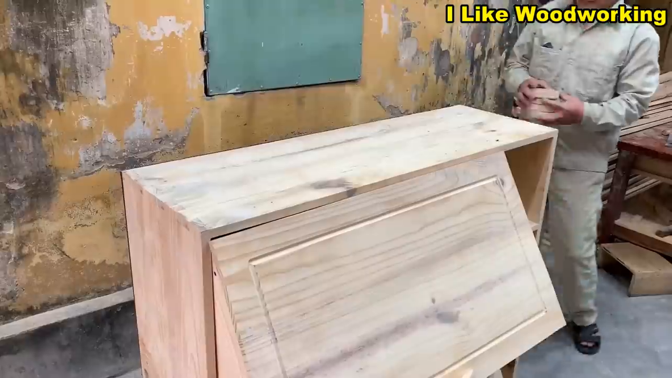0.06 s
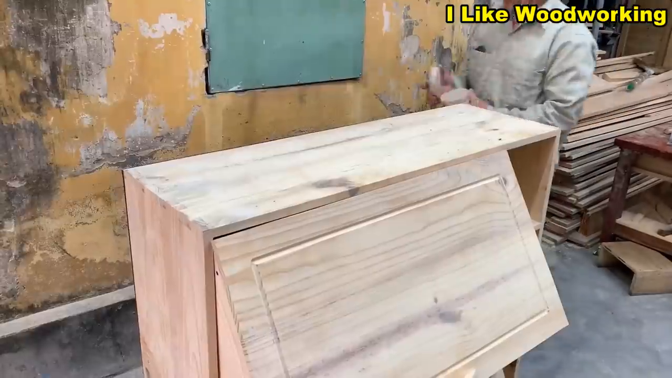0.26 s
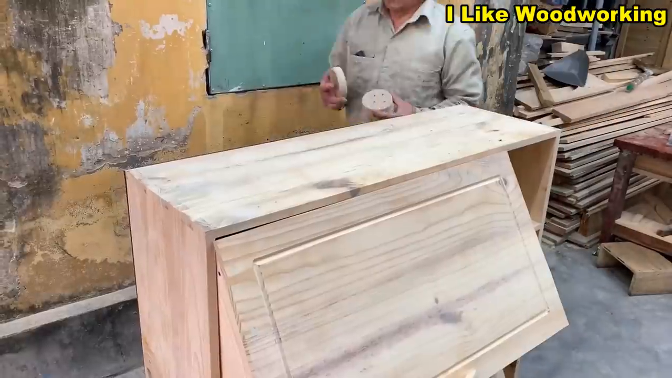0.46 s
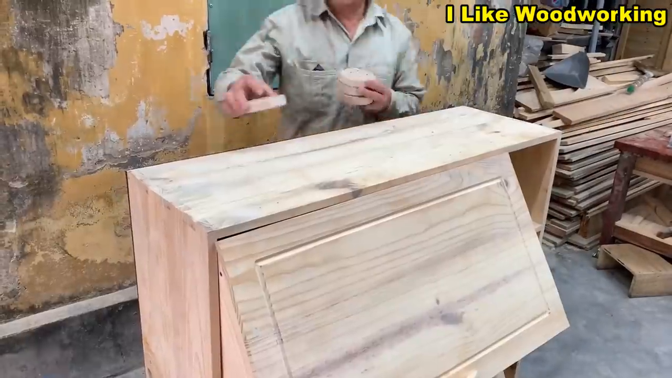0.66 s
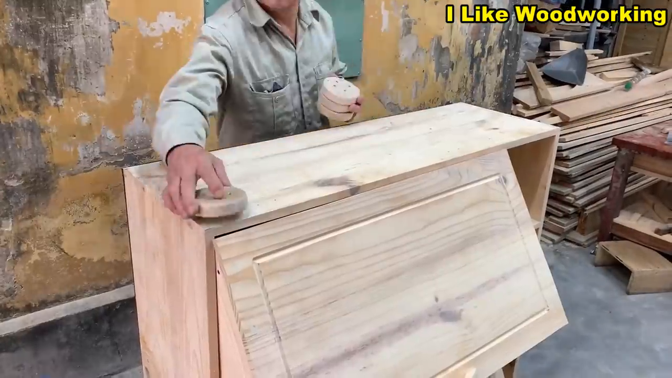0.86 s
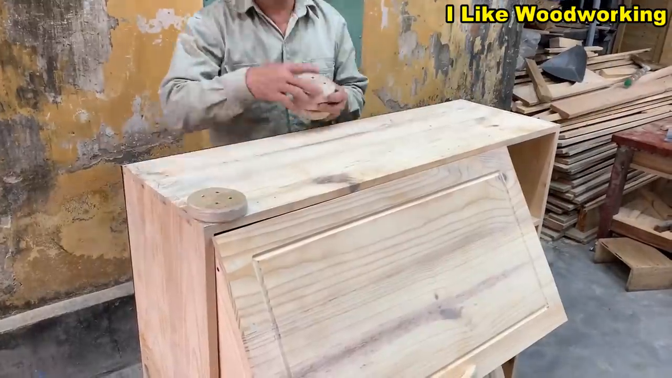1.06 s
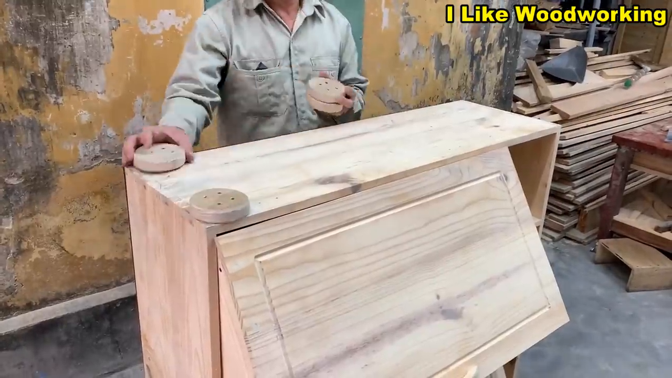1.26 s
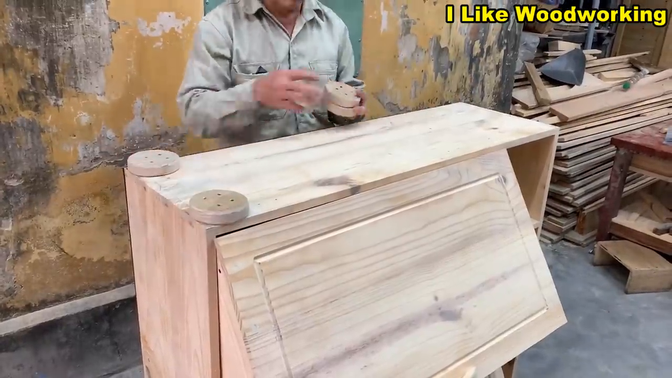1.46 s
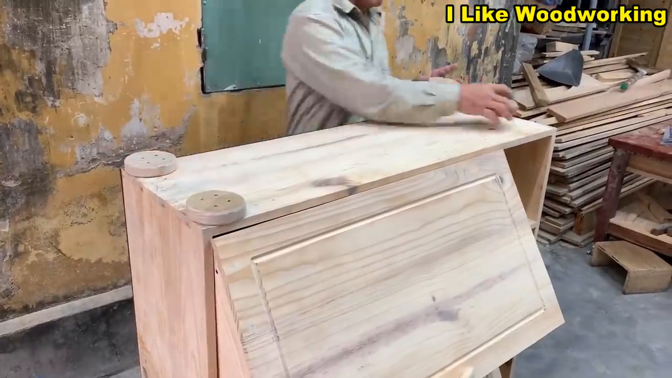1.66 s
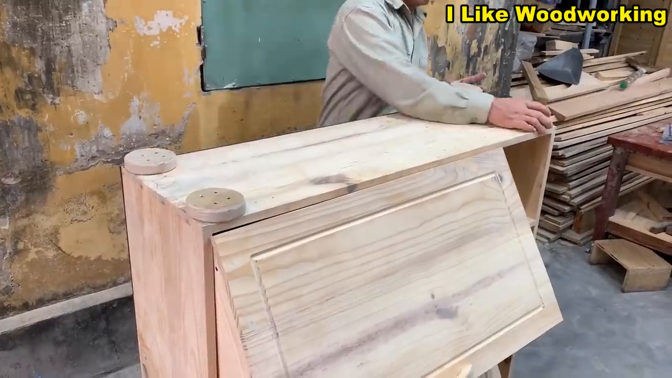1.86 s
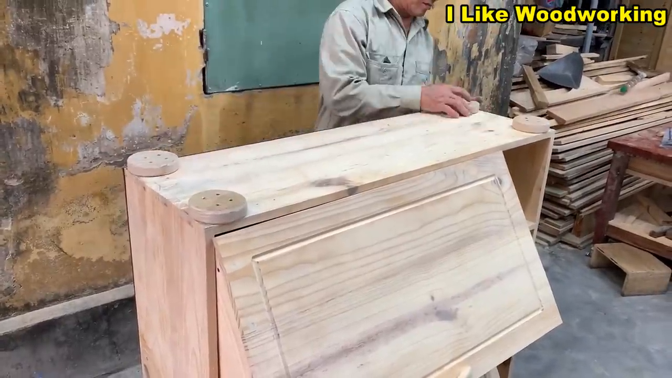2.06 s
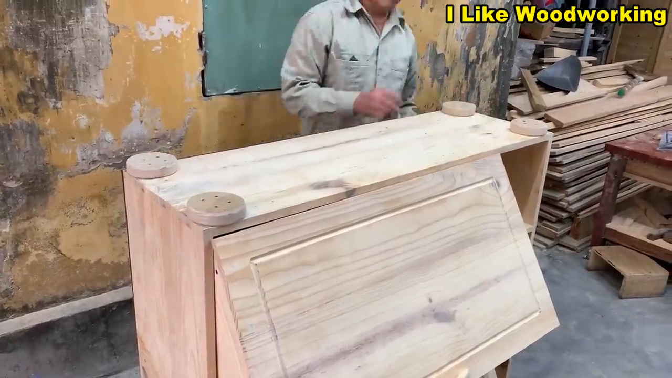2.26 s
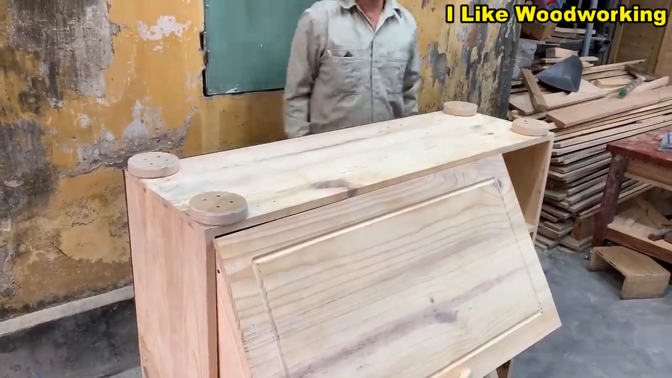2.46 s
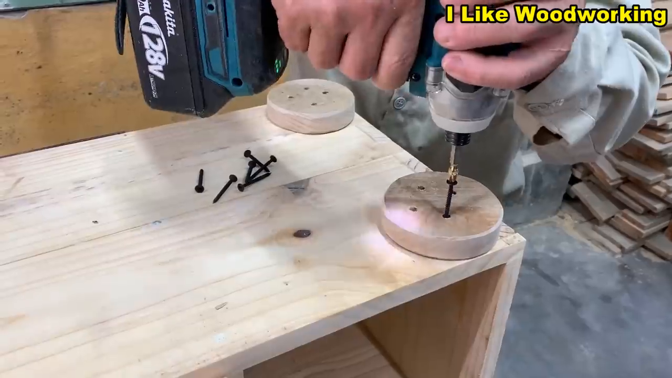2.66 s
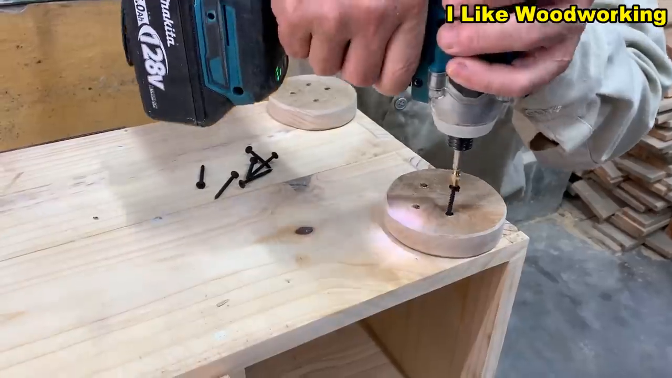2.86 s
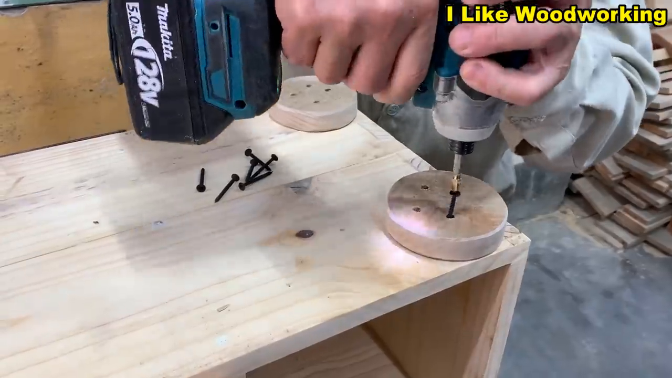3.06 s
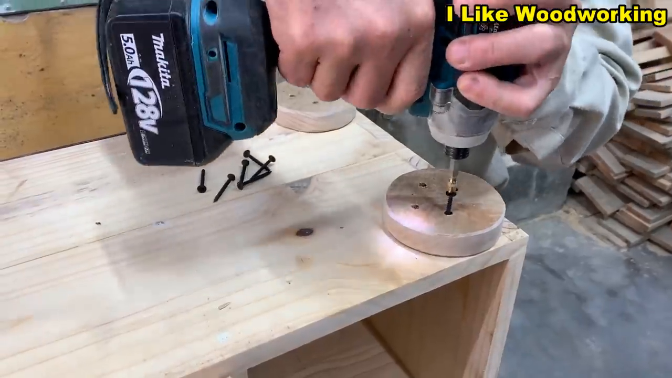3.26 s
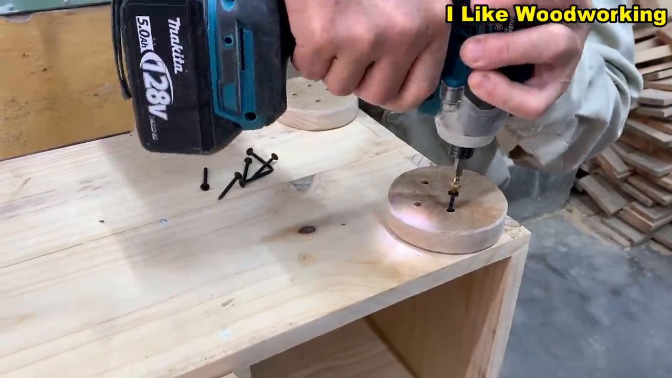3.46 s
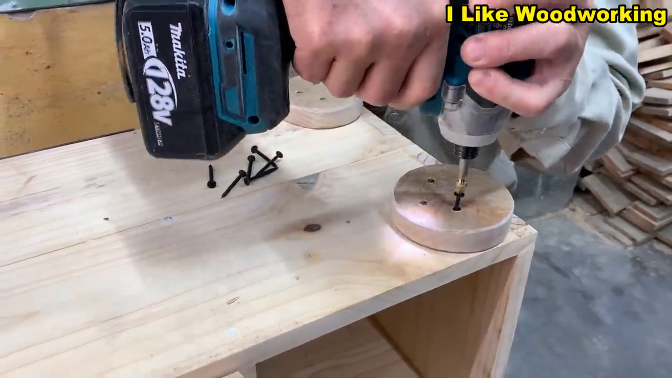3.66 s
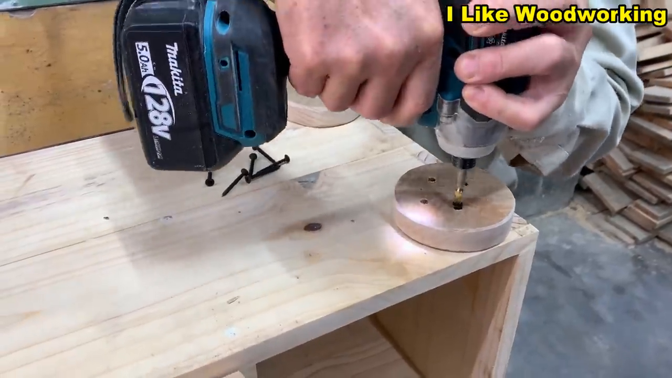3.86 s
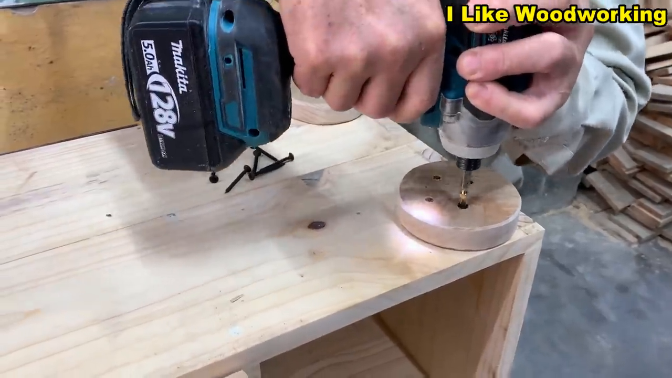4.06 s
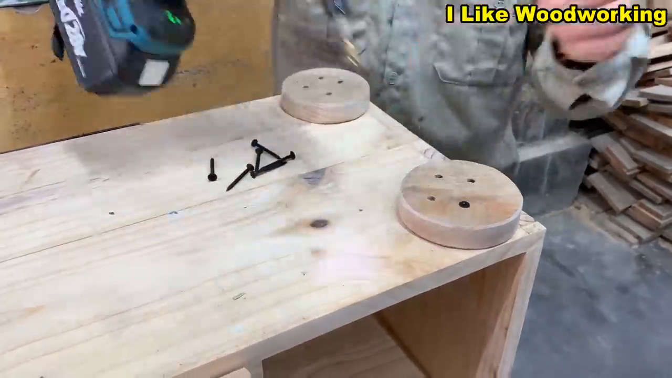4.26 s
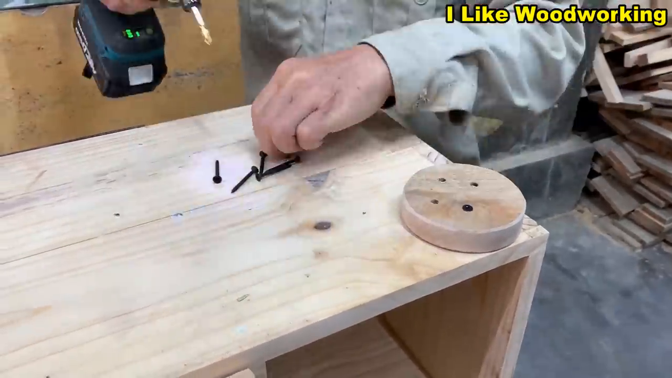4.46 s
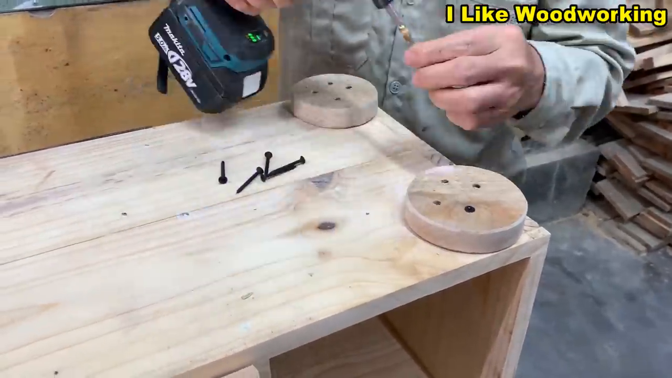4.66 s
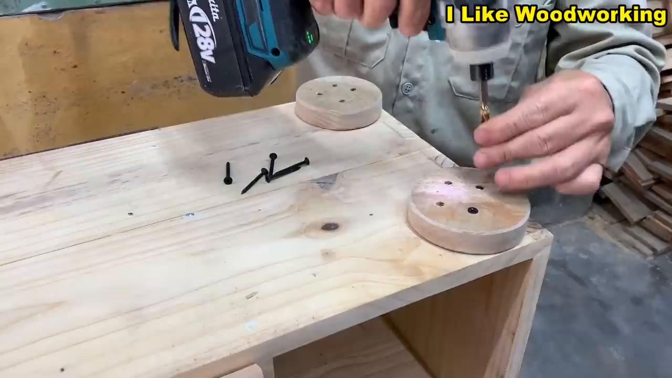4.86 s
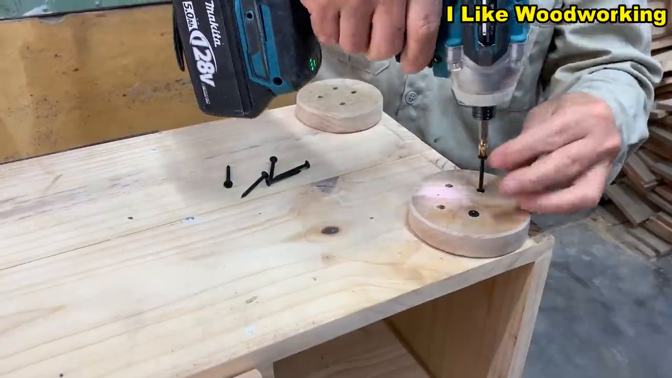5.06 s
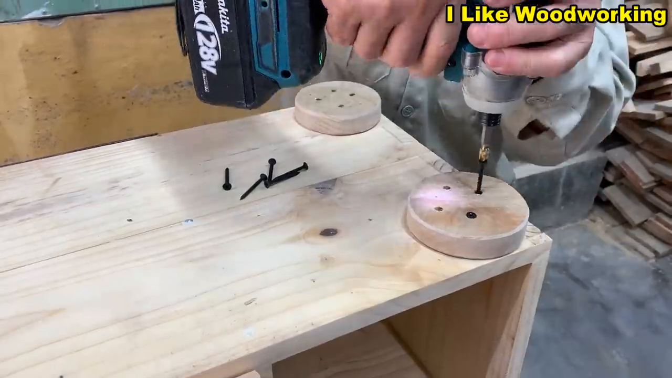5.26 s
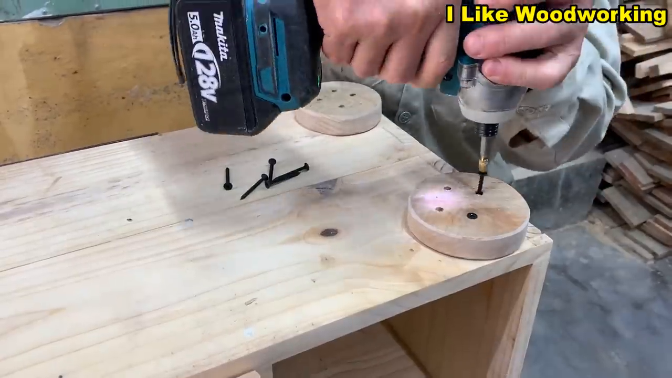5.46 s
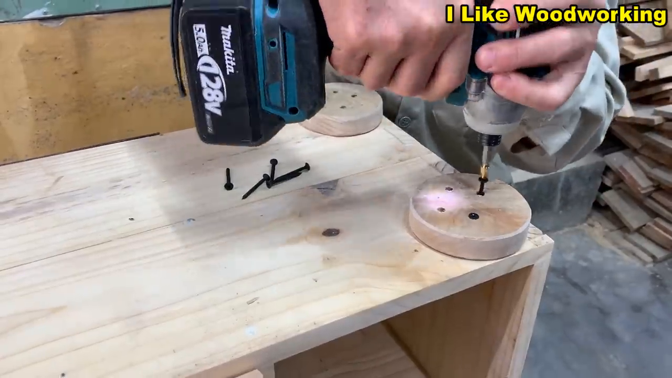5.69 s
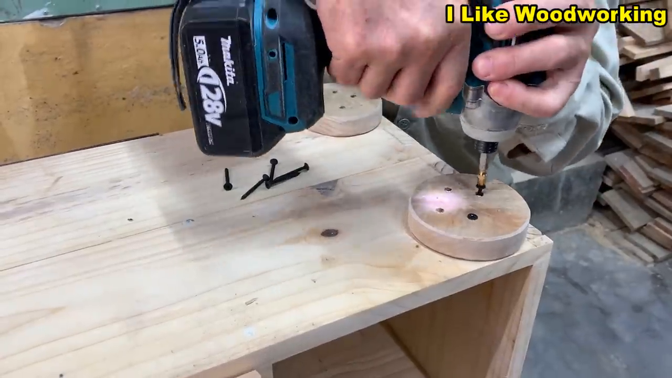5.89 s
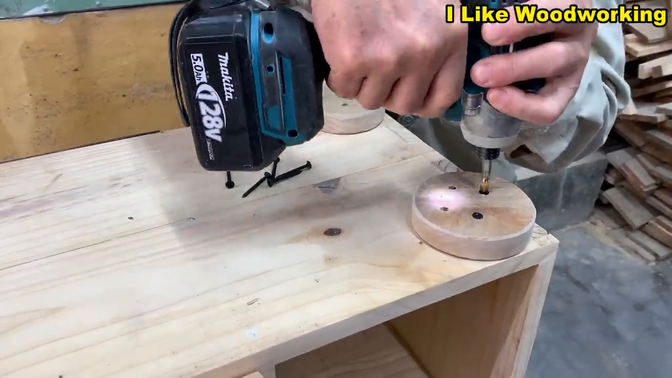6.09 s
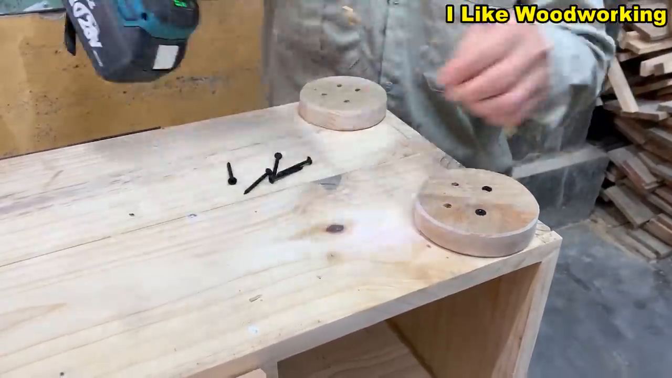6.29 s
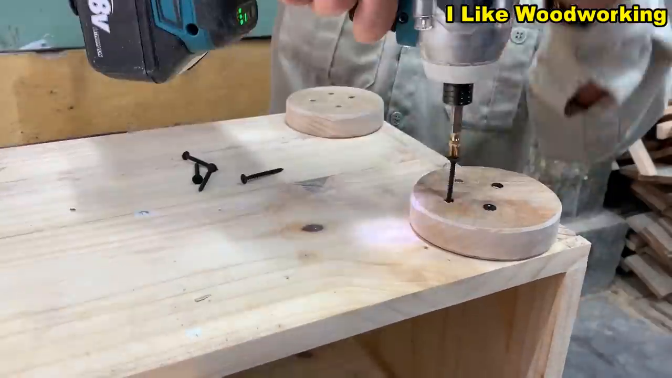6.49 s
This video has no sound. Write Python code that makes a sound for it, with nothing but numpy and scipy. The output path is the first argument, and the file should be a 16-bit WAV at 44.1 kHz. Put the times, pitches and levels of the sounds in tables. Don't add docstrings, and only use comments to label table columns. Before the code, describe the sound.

In a humming workshop, sharp knocks on wood give way to harsh, stuttering pulses of a cordless driver sinking screws into a cabinet.

```python
import sys
import numpy as np
from scipy import signal
from scipy.fft import rfft, irfft, next_fast_len
from scipy.io import wavfile
from scipy.ndimage import uniform_filter1d

SR = 44100
rng = np.random.default_rng(int(sys.argv[2]) if len(sys.argv) > 2 else 0)


def how_loud(loudness_db):
    steps = np.asarray(loudness_db, float) / 20
    return 10 ** steps


def inscribe(sig):
    pcm = np.round(np.clip(np.atleast_2d(sig).T, -1, 1) * 32767)
    wavfile.write(sys.argv[1], SR, pcm.astype(np.int16))


N = 287973
T = np.arange(N) / SR
FIRST_PULL = round(2.9 * SR)


def evened(x):
    return x / np.sqrt(np.mean(x ** 2) + 1e-20)


def colour(x, points):
    size = next_fast_len(len(x))
    hz, db = np.transpose(points)
    shape_db = np.interp(np.log(np.fft.rfftfreq(size, 1 / SR) + 1), np.log(hz + 1), db)
    return irfft(rfft(x, size) * how_loud(shape_db), size)[:len(x)]


def resonate(x, hz, width):
    r = np.exp(-np.pi * width / SR)
    if np.ndim(hz) == 0:
        cosine = np.cos(2 * np.pi * hz / SR)
        return np.sqrt(1 - r * r) * signal.lfilter([2, -2 * r * cosine], [1, -2 * r * cosine, r * r], x)
    turn = np.exp(2j * np.pi * np.cumsum(hz) / SR)
    return 2 * (turn * signal.lfilter([np.sqrt(1 - r * r)], [1, -r], x / turn)).real


def wander(count, span_s):
    knots = rng.standard_normal(int(count / SR / span_s) + 2)
    return np.interp(np.arange(count) / SR / span_s, np.arange(len(knots)), knots)


def body(x, modes, patchy_db, span_s=.012, tilt_db=0):
    centre_hz = modes[len(modes) // 2][0]
    out = 0
    for k, (hz, width, db) in enumerate(modes):
        drive_db = db + tilt_db * np.log2(hz / centre_hz) + patchy_db * wander(len(x), span_s)
        rung = resonate(x * how_loud(drive_db), hz, width)
        out = out + (-1) ** k * resonate(rung, hz, 510)
    return out


def slips(count, per_s, spread_db, smooth):
    size = how_loud(spread_db * np.minimum(rng.exponential(1, count), 3))
    hits = size * (rng.random(count) < per_s / SR)
    scrape = signal.lfilter([1], [1, -.97], hits)
    return evened((evened(scrape) + smooth) * rng.standard_normal(count))


def add(mix, s, sound):
    part = mix[round(s * SR):][:len(sound)]
    part += sound[:len(part)]


def curve(table, column):
    rows = np.array(table)
    return np.interp(T, rows[:, 0], rows[:, column])


def level(shapes):
    out = np.zeros(N)
    for start, corners in shapes:
        s, db = np.transpose(corners)
        at = round(start * SR) + np.arange(round(s[0] * SR), round(s[-1] * SR))
        out[at] = np.maximum(out[at], how_loud(np.interp(T[at] - start, s, db)))
    return out


def dying(start, db, db_per_s, span=0.13):
    return start, [(0, db), (span, db + db_per_s * span)]


# start_s, end_s
JOINTS = [
    (.138, .148),
    (2.622, 2.637),
]
FAR_SHOTS = T < JOINTS[1][1]
# time_s, level_db
HISS = [(0, -50), (.38, -57.5), (1.01, -51), (1.38, -53), (1.47, -57), (1.5, -52), (1.75, -53.5),
        (1.79, -56.5), (1.87, -54), (2.06, -52.5), (2.62, -52.5), (2.64, -57.5), (2.95, -52), (4.35, -63.5),
        (4.95, -66), (5.07, -68), (5.5, -65), (6.53, -67)]
# pitch_hz, level_db (per Hz)
HALL = [
    [(30, -44), (100, -10), (200, -12.5), (700, -13.5), (1000, -24.5), (1300, -27), (1570, -16),
     (2740, -14.5), (3700, -16), (6050, -14), (15100, -26), (16500, -35.5)],
    [(30, -48.5), (100, -8.5), (210, -3), (700, -25), (1090, -39), (2600, -26.5), (3780, -29.5),
     (5920, -23), (14800, -36), (16500, -30)],
]
# pitch_hz, side_db (against the middle)
HALL_WIDE = [(60, 6.5), (150, -22), (380, -54), (950, 4), (2380, -0.5), (5980, 1), (15000, 0)]


def hall():
    mid, side = np.zeros((2, N))
    swell = how_loud(curve(HISS, column=1) + 1.5 * wander(N, .05) + 1.5)
    for on, shape in zip([T < JOINTS[1][0], T > JOINTS[1][0]], HALL):
        a = colour(rng.standard_normal(N), shape)
        b = colour(rng.standard_normal(N), shape)
        treble = colour(a, [(1300, -60), (1400, 0)]).std()
        mid += on * swell * a / treble
        side += on * swell * colour(b, HALL_WIDE) / treble
    return np.array([mid + side, mid - side])


# time_s, speed_hz, level_db
HUM = [(0, 202, -10), (.7, 201, 11), (1.4, 201, 7), (1.6, 204, 1), (2.62, 203.5, 3.5), (2.64, 203.3, 2),
       (4.5, 203.2, -4.5), (6.53, 203.2, -8.5)]
# from_s, first_db, second_db, third_db, fourth_db
HUM_LOW = [
    (0, -65.5, -70.5, -60.5, -68),
    (1.5, -59.5, -59, -59, -59.5),
    (2.63, -64.5, -64.5, -72, -54.5),
]
# multiple (of the speed), level_db (against the hiss)
HUM_TOP = [(5, -8.5), (6, -15), (7, -8), (8, -7), (9, -15), (11, -13.5), (12, -17)]


def hum():
    speed_hz, hum_db = curve(HUM, column=1), curve(HUM, column=2)
    hiss_db = curve(HISS, column=1)
    turns = np.cumsum(speed_hz) / SR
    lag_s = 0.00042 * FAR_SHOTS
    ports = np.array([turns, turns - lag_s * speed_hz])
    low = np.array(HUM_LOW)
    place = np.maximum(np.searchsorted(low[:, 0], T) - 1, 0)
    levels = [(k, low[place, k] + hum_db) for k in range(1, 5)]
    levels += [(k, hiss_db + db - 9.6 * (place == 2)) for k, db in HUM_TOP]
    out = np.zeros((2, N))
    for k, db in levels:
        out += how_loud(db + 1.3 * wander(N, .06) + 3) * np.sin(2 * np.pi * (k * ports + rng.random()))
    return out


# start_s, length_s, level_db, pitch_hz
SWISHES = [(0.548, 0.39, -56.5, 1140), (0.554, 0.046, -54.5, 11820), (0.875, .05, -52.5, 10900),
           (.94, 0.039, -50.5, 7000), (1.91, 0.052, -52, 8000), (4.895, .14, -63.5, 2280),
           (5.117, 0.13, -65, 2300), (4.719, 0.13, -69, 2300)]


def swish():
    out = np.zeros(N)
    for s, length, db, hz in SWISHES:
        swell = np.sin(np.pi * T[:round(length * SR)] / length)
        rub = rng.standard_normal(len(swell))
        cloth = resonate(resonate(rub, hz, 0.89 * hz), hz, 0.89 * hz)
        add(out, s, how_loud(db) * swell * evened(cloth))
    return out


# start_s, peak_db, pitch_hz, brightness_db (against the peak)
BUMPS = [(0.221, -27.5, 450, -8), (1.369, -34.5, 202, -20), (1.502, -29, 232, -19), (1.738, -38, 240, -25),
         (2.638, -30, 250, -17), (2.739, -24, 450, -8.5), (2.763, -24, 212, -33), (2.806, -31.5, 544, -2),
         (2.819, -28, 275, -30), (2.837, -25, 216, -0.5), (2.864, -38, 373, -15), (2.885, -21.5, 275, -9),
         (2.926, -31, 299, -26), (3.258, -28.5, 428, -20), (3.461, -25, 335, -5.5), (4.419, -38, 328, -3),
         (4.599, -35, 396, -28), (4.618, -29.5, 283, -15.5), (4.914, -43, 248, -23),
         (5.006, -41.5, 250, -40), (5.176, -39, 676, -11), (5.202, -36.5, 260, -20), (5.452, -39, 303, -28),
         (5.493, -32, 366, -26), (5.726, -28.5, 260, -5.5), (5.743, -25.5, 229, -4.5),
         (6.396, -30.5, 425, -21), (6.424, -30.5, 363, -5), (6.461, -45.5, 295, 5.5),
         (.272, -46, 298, -18), (.297, -60, 300, -20), (.45, -43.5, 300, -20), (.617, -40, 297, -20),
          (1.358, -47, 220, -25), (1.382, -48, 350, -20), (1.425, -39, 350, -25), (1.525, -41, 375, -20),
          (1.553, -43, 237, -25), (1.6, -50, 298, -27), (1.683, -52, 400, -20), (1.722, -40, 239, -25),
          (1.757, -39, 298, -24), (1.833, -56, 800, 12), (2.673, -36.5, 245, -25), (2.7, -33.5, 288, -25),
          (2.724, -32.5, 402, -14), (2.813, -35.5, 500, -2), (2.847, -26.5, 450, -7), (2.854, -34, 500, -3),
          (2.873, -31.5, 500, -3.5), (2.879, -34, 500, -6), (2.903, -39, 396, -4.5),
          (2.917, -30.5, 296, -28), (4.347, -28, 450, -5.5), (4.363, -36, 450, -8), (4.633, -36, 300, -8),
          (4.734, -43.5, 300, -15), (5.236, -33.5, 302, -23), (5.248, -35, 355, -14),
          (6.408, -34.5, 400, -11.5), (6.447, -39, 400, -8), (6.466, -35.5, 300, -20),
          (6.489, -38, 300, -4), (6.507, -41, 300, -19)]


def bumps():
    out, t = np.zeros(N), T[:3000]
    for s, db, hz, bright_db in BUMPS:
        noise = rng.standard_normal(len(t))
        blow = noise * how_loud(-60 * t / .04) * np.minimum(t / .003, 1)
        low = resonate(resonate(blow, hz, 230), hz, 390)
        edge = noise * how_loud(-60 * t / .011)
        for _ in range(3):
            edge = resonate(edge, 1100, 1100)
        add(out, s, how_loud(db) * (low / abs(low).max() + how_loud(bright_db + 3) * edge / abs(edge).max()))
    return out


# time_s, level_db
RUMBLE = [(0.0, -37), (0.3, -49), (0.42, -56.5), (0.93, -59.5), (1.33, -59.5), (2.62, -60.5), (2.72, -50),
          (2.84, -36.5), (2.93, -40), (3.1, -45.5), (4.18, -43), (4.42, -53.5), (4.71, -61), (5.05, -70.5),
          (5.2, -58.5), (5.42, -59), (5.51, -46.5), (6.53, -46)]
# pitch_hz, level_db (per Hz)
THUD = [(35, -49), (60, -17.5), (108, -14.5), (189, 8.5), (262, 12), (746, -3), (810, -2.5), (3000, -36),
        (3900, -74.5), (6600, -120)]


def creaking_rumble():
    lumps_db = curve(RUMBLE, column=1) - 1.5 + 3.5 * wander(N, .015)
    rumble = evened(colour(slips(N, 160, 3.0, .9), THUD))
    rumble = np.where(FAR_SHOTS, colour(rumble, [(800, 1), (1000, -20)]), rumble)
    ticks = evened(resonate(resonate(slips(N, 160, 1.6, 0), 800, 900), 800, 900))
    return how_loud(lumps_db) * (rumble + how_loud(-15) * ticks * ~FAR_SHOTS)


# start_s, peak_db, crack_db (against the peak), rattle_s (to fall 60 dB)
KNOCKS = [
    (0.012, -12, -11, 0.21),
    (0.103, -9.5, -6.5, 0.14),
    (1.006, -24.5, 4.5, 0.12),
    (1.868, -24.5, -7.5, 0.26),
    (2.048, -8.5, -7.5, 0.18),
]
CRACK_TOP_HZ = [15250, 15100, 12900, 6000, 9000]
# pitch_hz, width_hz, level_db
PANEL = [(250, 51, -6.5), (450, 194, -0.5), (676, 92, 1), (850, 180, -4), (1045, 40, -8), (1293, 53, -7.5),
         (1870, 1500, -15), (2390, 330, -2.5), (4990, 200, -25)]
# pitch_hz, width_hz, level_db
DISCS = [
    [(500, 80, -14), (836, 23, 2.5), (1480, 66, -17), (4660, 480, -5), (8400, 900, -23)],
    [(416, 21, -6), (700, 67.3, -6.5), (2220, 420, 0), (2830, 300, -9.5), (4660, 620, -17.5)],
    [(425, 20, -21), (690, 46, -15.5), (2310, 420, 1), (2860, 370, -6), (3390, 400, -8), (4300, 310, -4.5),
     (5200, 270, -10), (6230, 360, -4), (7650, 400, -11)],
]


def knocks():
    out, t = np.zeros(N), T[:SR // 4]
    for (s, db, crack_db, t60), modes, top_hz in zip(KNOCKS, [PANEL, PANEL] + DISCS, CRACK_TOP_HZ):
        rattle, hit = how_loud(-60 * t / t60), how_loud(7 - 60 * t / .02)
        blow = rng.standard_normal(len(t)) * (rattle + hit)
        rung = body(blow, modes, patchy_db=3.5, span_s=.006)
        crack_band = signal.butter(2, [1800, top_hz], "band", fs=SR, output="sos")
        crack = signal.sosfilt(crack_band, blow)
        add(out, s, how_loud(db) * (rung / abs(rung).max() + how_loud(crack_db) * crack / abs(crack).max()))
    return out


# start_s, peak_db
SNAPS = [(3.03, -2), (3.134, 1), (3.3237, -2.5), (3.3578, -12), (3.3948, -29.5), (3.3979, -20),
         (3.6674, -2), (4.1136, -18.5), (4.1266, -2), (4.329, -22.5), (5.351, -45), (5.461, -40.5),
         (5.538, -15.5), (4.23, -3.5), (5.5934, -9.5), (5.6067, -2), (5.6129, -11), (5.628, -10.5),
         (5.8269, -18), (5.838, -10.5), (5.8543, -10.5), (6.121, -20), (6.126, 0), (6.1677, -12.5),
         (6.1768, -12), (6.1814, -8.5)]
# start_s, level_db
JERKS = [(2.974, -2.5), (2.987, -7), (3.036, -5.5), (3.14, -9.5), (3.296, -3.5), (3.503, -4.5),
         (3.526, -1.5), (3.657, 0.5), (3.825, -2.5), (3.836, 1), (3.99, 3), (4.129, -2.5), (4.255, 4),
         (4.261, 4.5), (4.268, 1), (5.578, -1), (5.787, 0), (5.792, -6), (5.835, -3.5), (5.86, -2.5),
         (5.985, -0.5), (6.129, -3.5), (6.284, 4.5), (6.298, -4)]
# pitch_hz, level_db (per Hz)
STEEL = [(700, -24.5), (1470, -7.5), (2500, -4), (3050, -9), (4050, -8.5), (4340, -3.5), (7150, -4),
         (9570, -1.5), (10300, -9), (14400, -0.5), (16000, -9), (16500, -127)]
# pitch_hz, width_hz, level_db
SCREW = [(1171, 33, -5), (1407, 110, -0.5), (1501, 40, -3.5), (1697, 96, 3), (1774, 16, -1),
         (1974, 160, 1.5), (2079, 75, -1), (2251, 110, -2.5), (2608, 570, -9), (3140, 300, -4.5)]
# pitch_hz, width_hz, level_db
CABINET = [(306.6, 23, -17.5), (398.3, 72, 1.5), (425, 27, -1), (578.5, 120, -3), (622, 10, 2.5),
           (654.4, 14, 5), (673.3, 45, 5), (819.7, 13, 1.5), (934, 47, -6.5), (1004, 15, -5.5)]


def snaps():
    out, push, t = np.zeros(N), np.zeros(N), T[:600]
    for s, db in SNAPS:
        spit = evened(colour(rng.standard_normal(len(t)), STEEL))
        add(out, s, how_loud(db - 15.5 - 60 * t / 0.023) * spit)
    for s, db in SNAPS + JERKS:
        add(push, s, how_loud(np.array([db])))
    wood = body(push[FIRST_PULL:], SCREW + CABINET, patchy_db=3.5)
    add(out, FIRST_PULL / SR, how_loud(-28.5) * wood)
    return out


# start_s,
# length_s, from_hz, to_hz, level_db
SQUEALS = [
    (3.965, 0.023, 9400, 14750, -22),
    (5.556, 0.056, 2900, 1850, -32.5),
    (5.782, 0.038, 2190, 1835, -25.5),
    (5.964, .022, 5650, 8950, -30.5),
    (6.13, 0.029, 10000, 14570, -19),
    (6.325, 0.023, 660, 643, -28.5),
]
SKIPS = [6.1355, 6.1415, 6.1565]


def squeals():
    glide, swell = 0.24, 0.16
    hz, shapes = np.zeros(N), []
    for s, n, from_hz, to_hz, db in SQUEALS:
        on = (T >= s - .001) & (T < s + n + .001)
        hz[on] = to_hz + (from_hz - to_hz) * np.exp(-(T[on] - s) / (glide * n))
        shapes.append((s, [(0, db + 2), (swell * n, db), (n - swell * n, db + 4.5), (n, db - 7.0)]))
    for s in SKIPS:
        hz[abs(T - s) < .0012] = 11750
    hz = uniform_filter1d(hz, size=30) * (1 + .012 * wander(N, .003))
    flutter_db = 2.1 * evened(uniform_filter1d(rng.standard_normal(N), 90))
    return level(shapes) * how_loud(flutter_db + 2.5) * np.sin(2 * np.pi * np.cumsum(hz) / SR)


# bite_s, length_s, rasp_db, sag_db (by the release), ring_hz (of the bit)
PULLS = [(2.967, 0.055, -18.5, -16.5, 8000), (3.117, 0.068, -14.5, -16.5, 9000),
         (3.289, .073, -18, -6.5, 9860), (3.48, 0.056, -14.5, -11.5, 7370), (3.642, 0.059, -17.5, -8, 9920),
         (3.795, 0.062, -18.5, -3, 9850), (3.958, 0.054, -20, -8.5, 13500), (4.1, 0.045, -20, -9, 8500),
         (4.227, 0.047, -18.5, -11, 8100), (5.535, 0.11, -19, -7, 8570), (5.778, 0.08, -22, 0, 9300),
         (5.948, 0.074, -19, -5, 8380), (6.121, 0.055, -28, -6, 14300), (6.271, 0.029, -21, -3, 8600)]
# rise_s (of the rasp), creak_tilt_db, boom_tilt_db (both per octave)
SEATS = [(.006, 3, 1), (0.0014, 1, -3.2), (.0015, 4.9, -5.3), (0.0089, -0.5, -0.5), (0.01, 3.5, -3.5),
         (.003, -0.5, -4.5), (.003, -1.5, -0.5), (.004, -1, -1), (.0012, 2.5, -6), (.0012, -2.7, 2),
         (.003, -2.2, 2), (0.00091, -1.8, 5.8), (0.0025, -2.5, 2), (.004, 1, -2.6)]
# start_s, rasp_db, creak_db, boom_db
REBOUNDS = [
    (3.029, -26.5, -24, -21),
    (3.21, -49, -34.5, -28.5),
    (3.397, -31.5, -37.5, -24.5),
    (6.323, -52, -40, -43),
]
BITES = np.array(PULLS)[:, 0]
PULL_NOW = np.maximum(np.searchsorted(BITES, T) - 1, 0)


def rasp_level():
    coast_db = -43
    shapes = []
    for (s, n, db, sag_db, _), (rise_s, _, _) in zip(PULLS, SEATS):
        shapes.append((s, [(0, db - 8.5), (rise_s, db), (n, db + sag_db)]))
        shapes.append((s + n, [(0, db + sag_db), (0.0073, coast_db)]))
        shapes.append(dying(s + n, coast_db, db_per_s=-300))
    shapes += [(s, [(0, db), (0.024, db - 18.5)]) for s, db, *_ in REBOUNDS]
    return uniform_filter1d(level(shapes), size=60)


# pitch_hz, width_hz, level_db
BIT = [(5500, 1000, 1.5), (7260, 1600, 20.5), (8700, 200, -33.5), (9900, 420, 14), (11380, 300, 2),
       (14300, 140, -15)]


def rasp():
    fine = slips(N, 400, 2.8, 1.0)
    ring_hz = np.array(PULLS)[PULL_NOW, 4]
    tones = evened(body(fine, BIT, patchy_db=4.5)) + how_loud(-2.5) * evened(resonate(fine, ring_hz, 260))
    steel = evened(colour(fine, STEEL)) + how_loud(-5) * tones
    return evened(steel) * rasp_level()


# grip_s, hold_s, creak_db, boom_db, jolt_db (of the bite before)
GRIPS = [(2.975, 0.0095, -22, -18.5, -28), (3.138, 0.03, -22, -21, -44), (3.321, 0.033, -22, -23.5, -8.5),
         (3.5, 0.034, -24, -19.5, -33), (3.654, 0.051, -24.5, -21.5, -8.5),
         (3.809, 0.046, -22.5, -20.5, -11.5), (3.991, 0.011, -20, -19, -12.5),
         (4.122, 0.015, -17, -16.5, -13), (4.235, 0.021, -18, -15, -15.5), (5.576, 0.067, -28, -24.5, -56),
         (5.821, 0.034, -25, -24, -14.5), (5.971, 0.049, -24.5, -23, -10.5),
         (6.177, 0.0069, -32.5, -23, -16), (6.276, 0.01, -20, -18.5, -21)]


def wood_level(column, db_per_s, kicks):
    shapes = list(kicks)
    for row in GRIPS:
        grip_s, hold_s, db = row[0], row[1], row[column]
        shapes.append((grip_s, [(-.006, db - 13), (0, db), (hold_s, db)]))
        shapes.append(dying(grip_s + hold_s, db, db_per_s))
    shapes += [dying(row[0], row[column], db_per_s) for row in REBOUNDS]
    return uniform_filter1d(level(shapes), size=150)


def struck(drive, gain, modes, tilt_db, span_s):
    ringing = .8
    out = np.zeros(N)
    gain = abs(gain[FIRST_PULL:]) + 1e-7
    push = drive[FIRST_PULL:] * gain ** ringing
    rung = body(push, modes, patchy_db=2.2, span_s=span_s, tilt_db=tilt_db[FIRST_PULL:])
    out[FIRST_PULL:] = evened(rung * gain ** (1 - ringing)) * np.sqrt(np.mean(gain ** 2))
    return out


def creak_and_boom():
    coarse = slips(N, 300, 2.5, .8)
    _, creak_tilt, boom_tilt = np.array(SEATS)[PULL_NOW].T
    catches = [dying(s + 0.0022, max(row[4], -40) - 8.5, -600) for s, row in zip(BITES, GRIPS)]
    jolts = [dying(s + 0.0032, row[4], -900, span=.05) for s, row in zip(BITES, GRIPS)]
    creak_level = wood_level(column=2, db_per_s=-620, kicks=catches)
    boom_level = wood_level(column=3, db_per_s=-520, kicks=jolts)
    creak = struck(coarse, creak_level, SCREW, creak_tilt, span_s=.03)
    boom = struck(coarse, boom_level, CABINET, boom_tilt, span_s=0.065)
    return creak + boom


# start_s, length_s, from_db, to_db
IDLES = [
    (2.929, 0.067, -37, -25),
    (5.463, .072, -46, -40.5),
]


def whirr():
    rub = rng.standard_normal(N)
    motor = evened(colour(rub, STEEL)) + how_loud(-6.5) * evened(resonate(rub, 8500, 500))
    winds = [(s, [(-.022, -53.5), (0, -28)]) for s in np.delete(BITES, 9)]
    winds += [(s, [(0, from_db), (n, to_db)]) for s, n, from_db, to_db in IDLES]
    return level(winds) * evened(motor)


def driver():
    return rasp() + creak_and_boom() + whirr()


def echoes(x, t60, start):
    taps, t = np.zeros(SR // 2), T[:SR // 2]
    at = np.arange(round(start * SR), len(taps) - 20, 20)
    taps[at + rng.integers(0, 20, len(at))] = rng.choice([-1., 1.], len(at))
    dull = signal.lfilter([.4], [1, -.6], taps)
    tail = dull * how_loud(-60 * t / t60) + 0.11 * taps * how_loud(-120 * t / t60)
    return signal.fftconvolve(x, tail / np.linalg.norm(tail))[:N]


# pitch_hz, side_db (against the middle)
WIDE = [(60, 2.5), (150, -30.5), (380, -42.5), (950, -52), (2380, -6.5), (5980, 0), (15000, -1.5)]
# pitch_hz, level_db
LEAN = [(1000, -35), (2500, -15), (5000, -15), (8000, -35), (13000, -16)]


def scene():
    no_bass = signal.butter(2, 280, "high", fs=SR, output="sos")
    tool = signal.sosfilt(no_bass, driver() + snaps())
    near = tool + squeals() + knocks() + bumps() + creaking_rumble() + swish()
    turn = 2 * np.pi * 1.5 * T
    paths = echoes(near * np.cos(turn), 0.0044, 0) + echoes(near * np.sin(turn), .015, 0)
    side = colour(paths, WIDE) - colour(tool, LEAN)
    room = how_loud(-16.5) * np.array([echoes(near, 0.18, .006), echoes(near, 0.19, .006)])
    heard = np.array([near + side, near - side]) * how_loud(np.array([[-.05], [.05]])) + room
    cut_short = (T > JOINTS[0][0]) & (T < .215)
    far_lean = how_loud(0.5 * np.array([[-.5], [.5]]) * FAR_SHOTS)
    return (heard * (1 - 0.56 * cut_short) + hum() + hall()) * far_lean


def band_limit(x):
    return signal.sosfilt(signal.butter(12, 16810, fs=SR, output="sos"), x)


def record(dry):
    thin = signal.sosfilt(signal.butter(3, 140, "high", fs=SR, output="sos"), dry)
    thin = .9 * np.tanh(thin / .9)
    thin = signal.sosfiltfilt(signal.butter(14, 16000, fs=SR, output="sos"), thin)
    gate = 1 - sum((T > a) & (T < b) for a, b in JOINTS) * .97
    mix = thin * uniform_filter1d(gate, size=40)
    return band_limit(mix)


dry = scene()
out = record(dry)
inscribe(out)
```